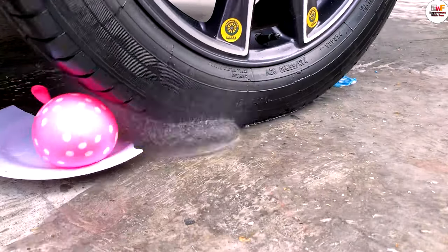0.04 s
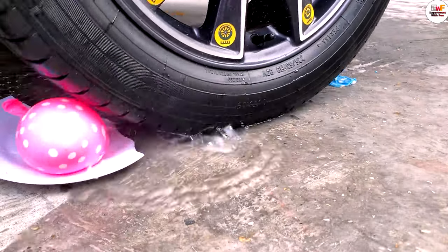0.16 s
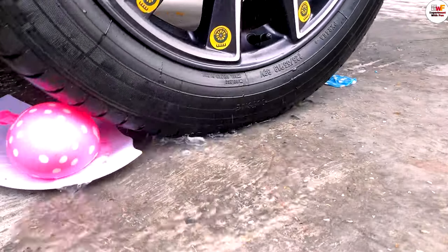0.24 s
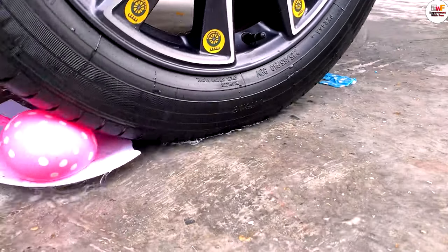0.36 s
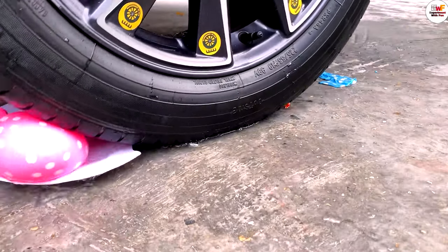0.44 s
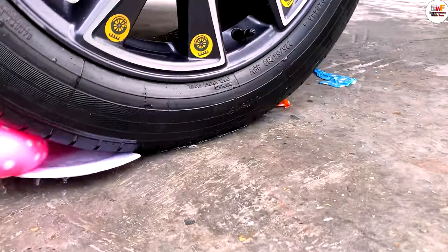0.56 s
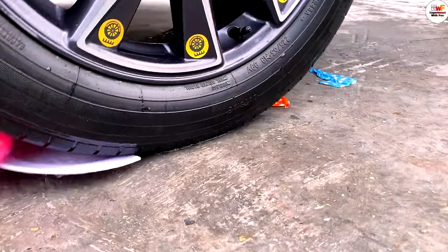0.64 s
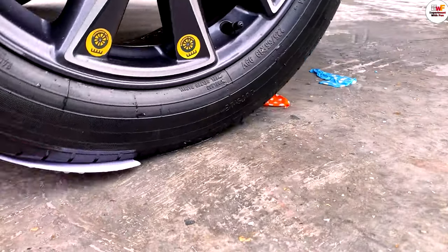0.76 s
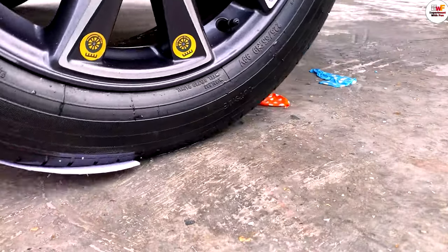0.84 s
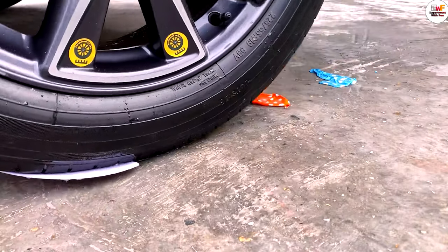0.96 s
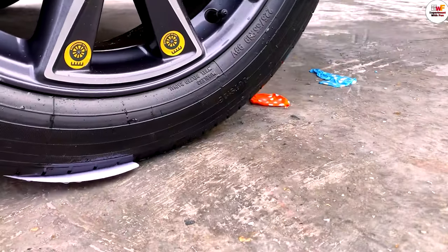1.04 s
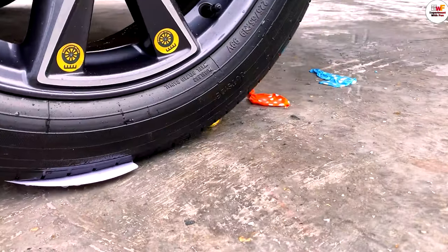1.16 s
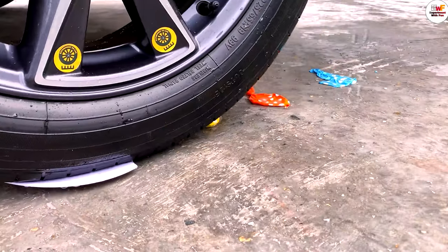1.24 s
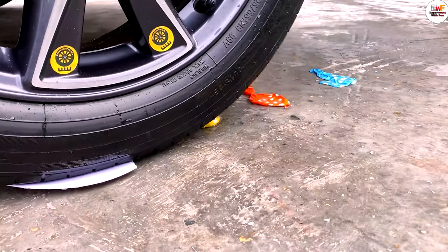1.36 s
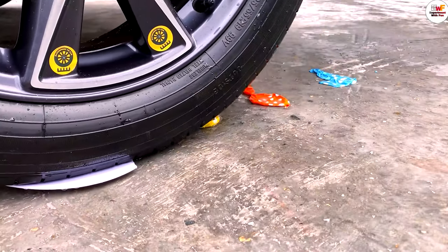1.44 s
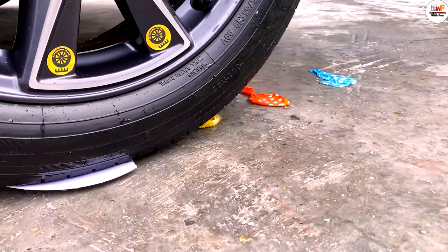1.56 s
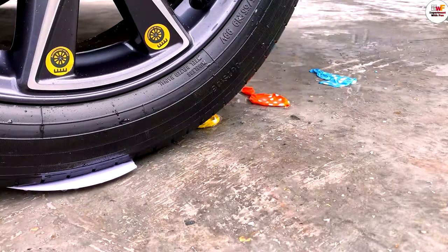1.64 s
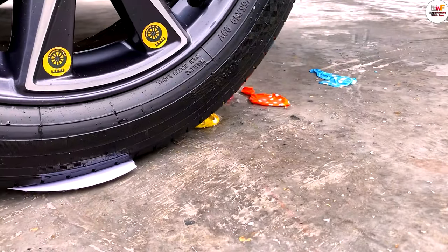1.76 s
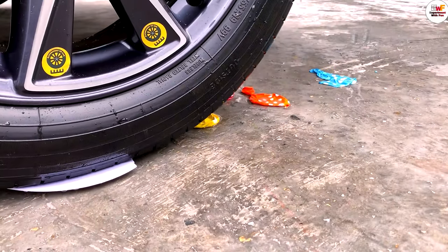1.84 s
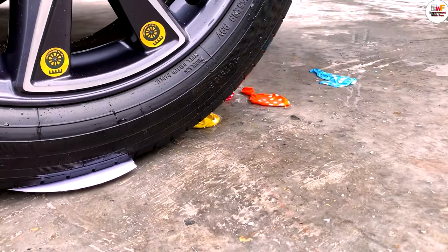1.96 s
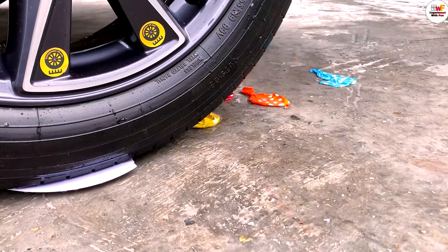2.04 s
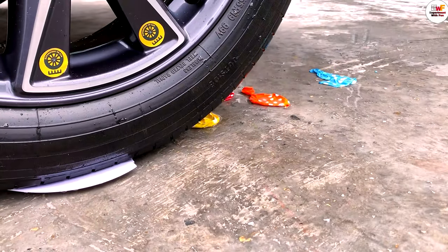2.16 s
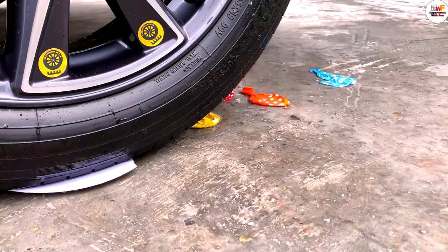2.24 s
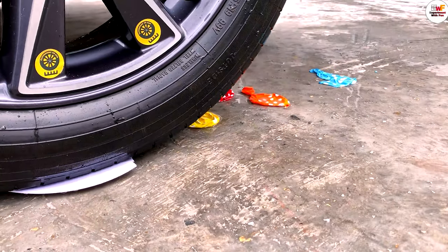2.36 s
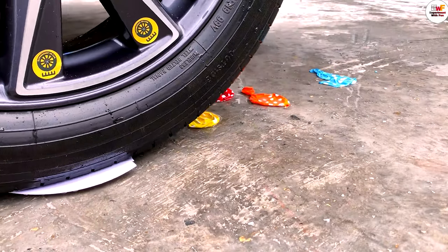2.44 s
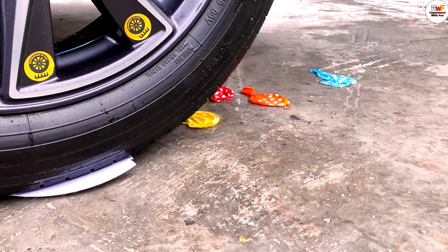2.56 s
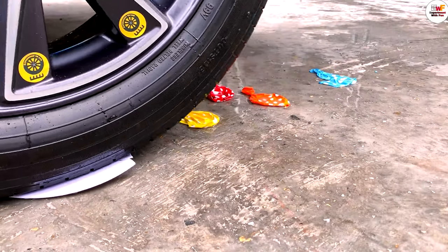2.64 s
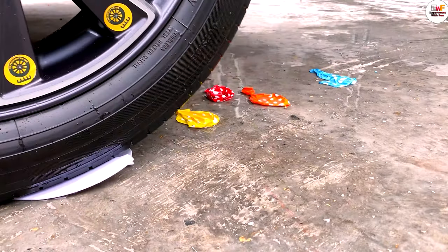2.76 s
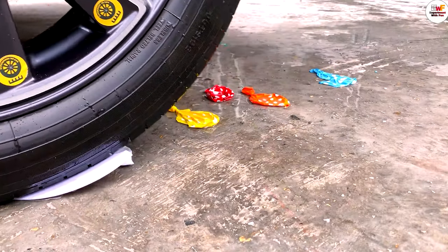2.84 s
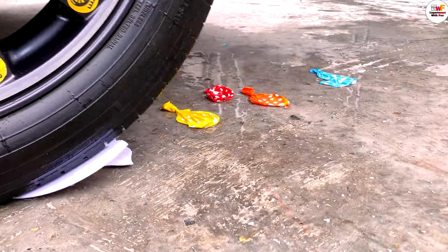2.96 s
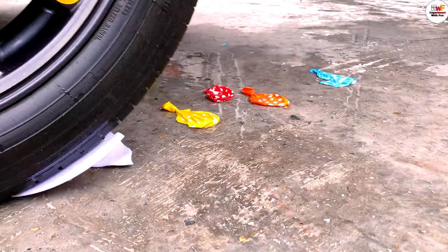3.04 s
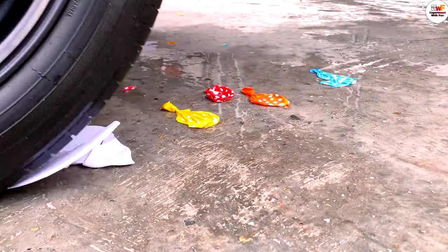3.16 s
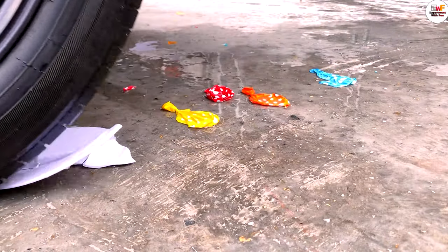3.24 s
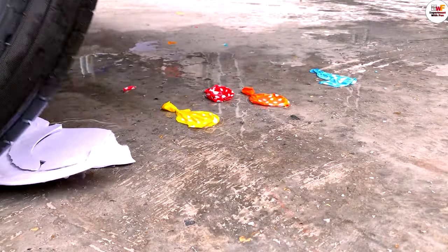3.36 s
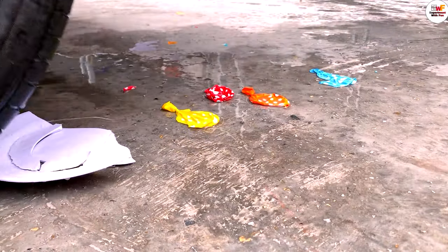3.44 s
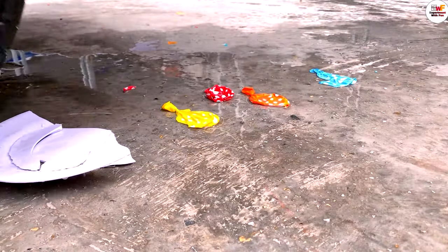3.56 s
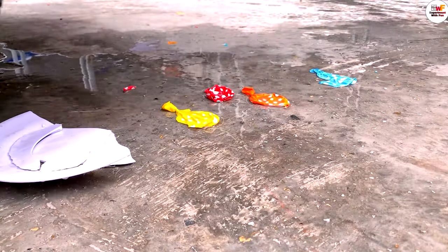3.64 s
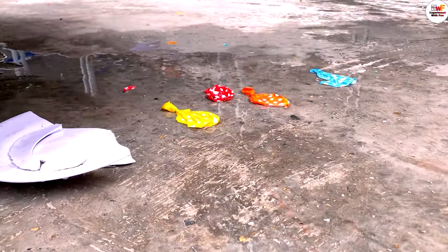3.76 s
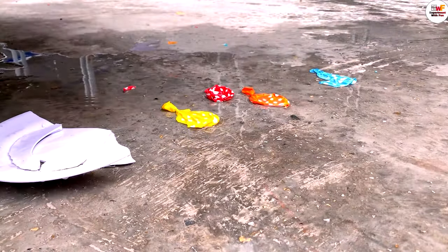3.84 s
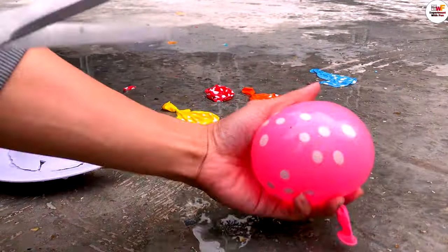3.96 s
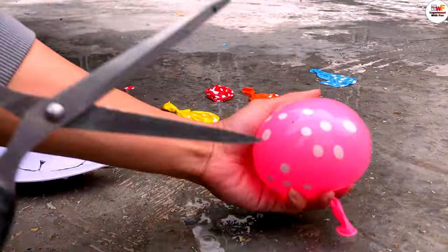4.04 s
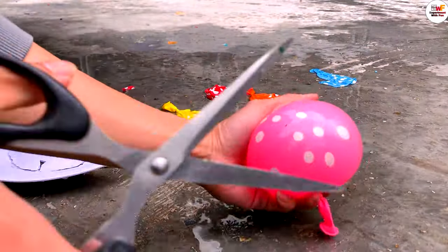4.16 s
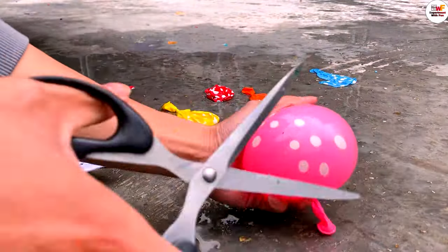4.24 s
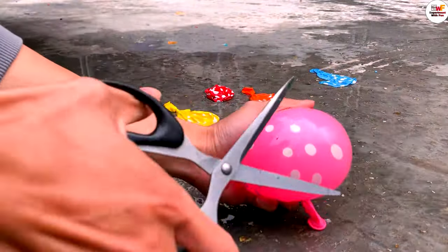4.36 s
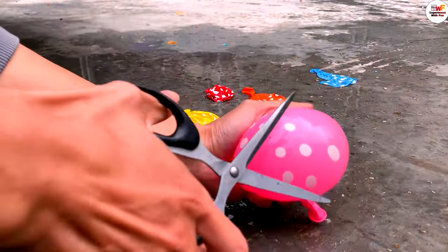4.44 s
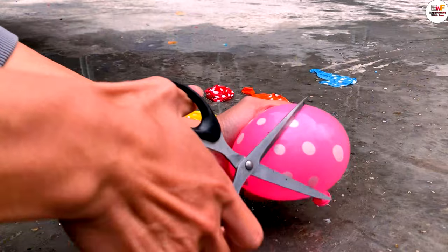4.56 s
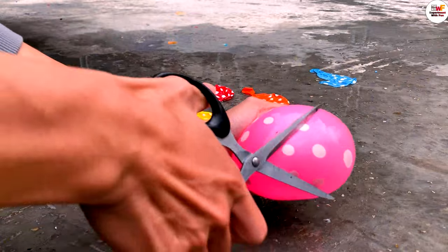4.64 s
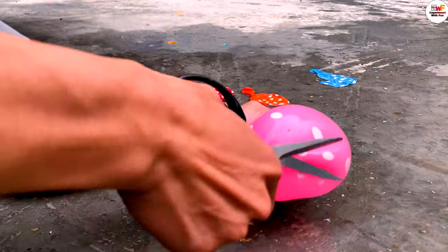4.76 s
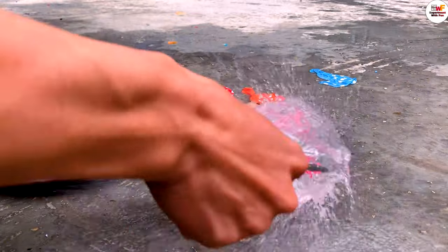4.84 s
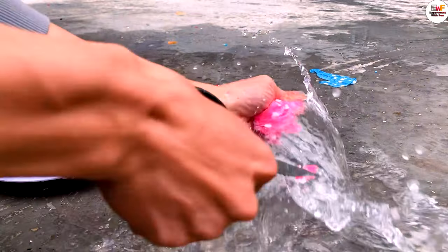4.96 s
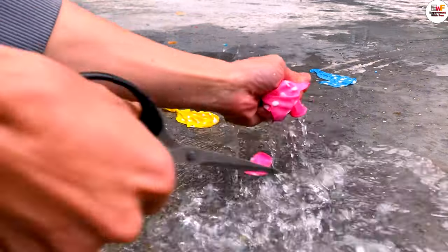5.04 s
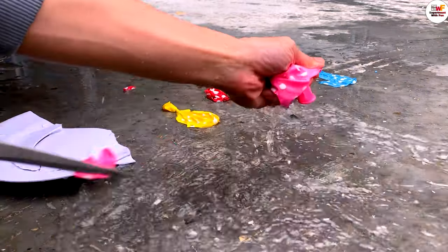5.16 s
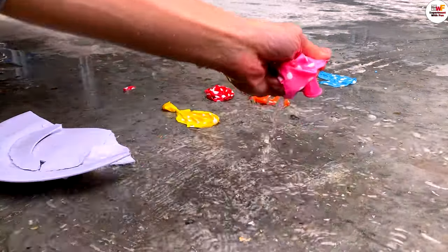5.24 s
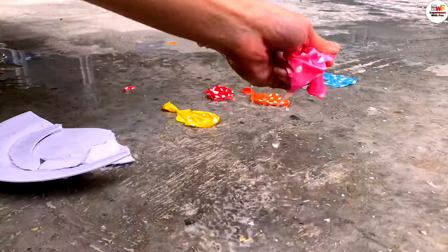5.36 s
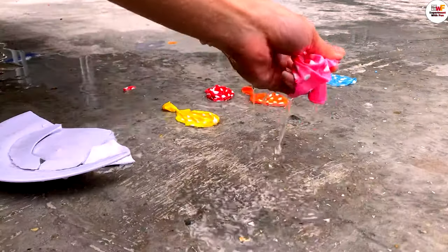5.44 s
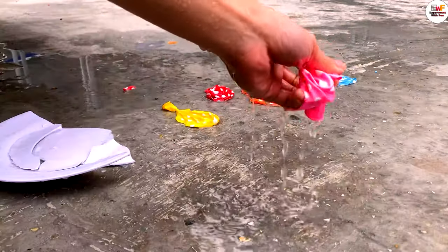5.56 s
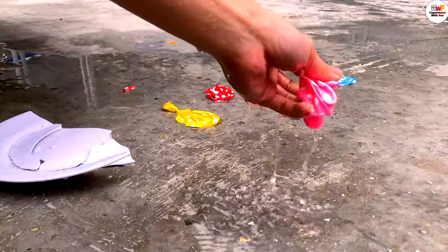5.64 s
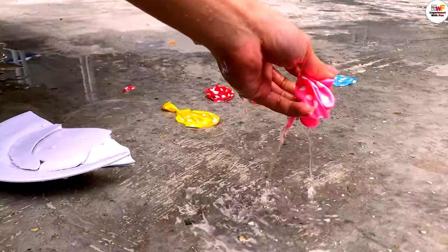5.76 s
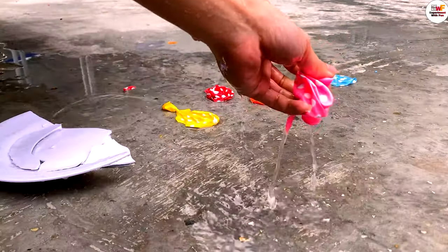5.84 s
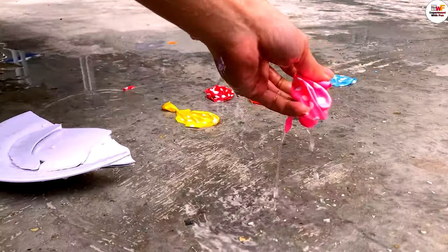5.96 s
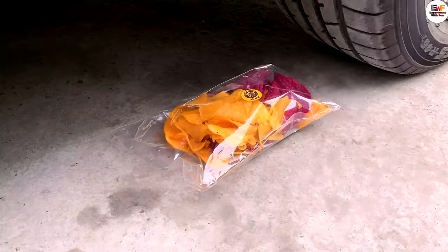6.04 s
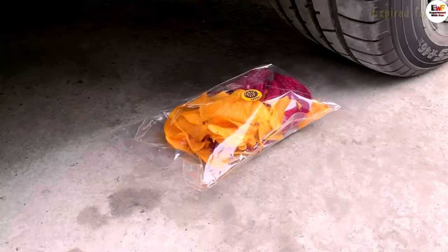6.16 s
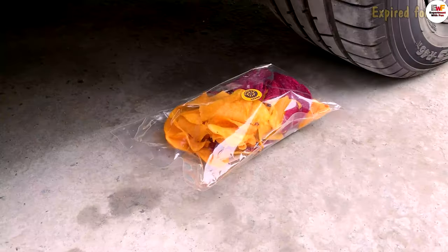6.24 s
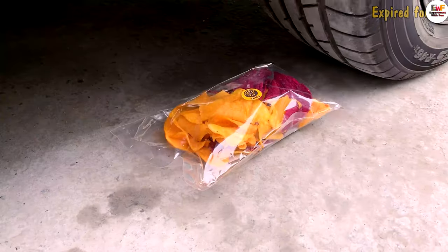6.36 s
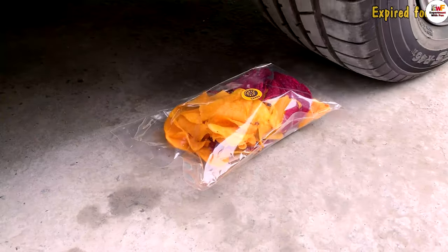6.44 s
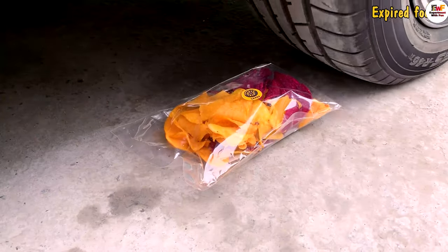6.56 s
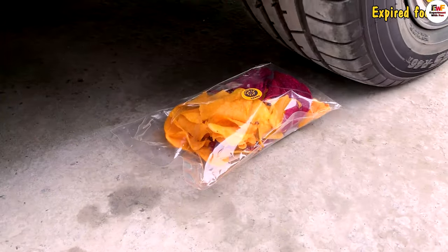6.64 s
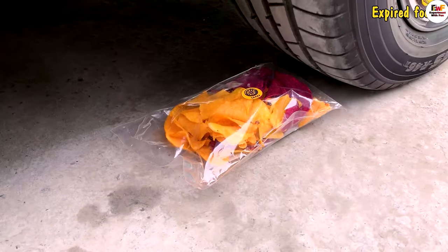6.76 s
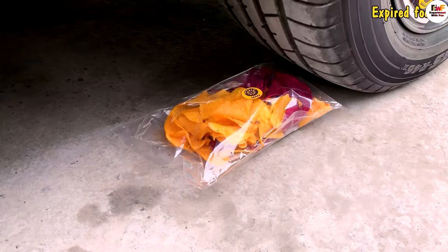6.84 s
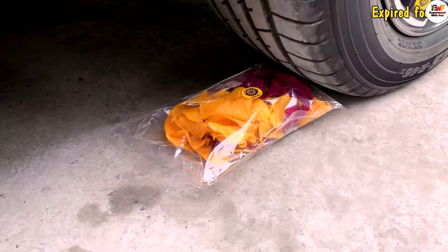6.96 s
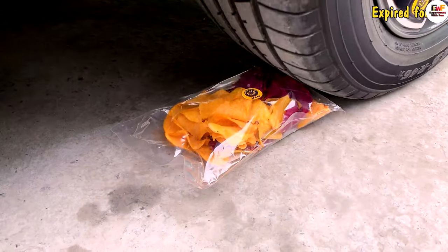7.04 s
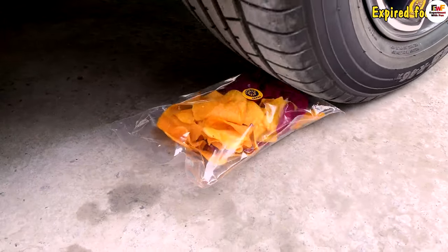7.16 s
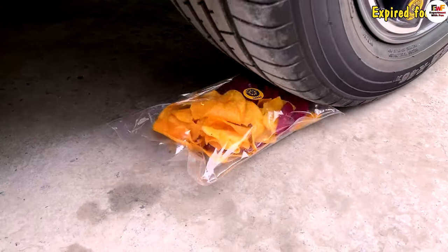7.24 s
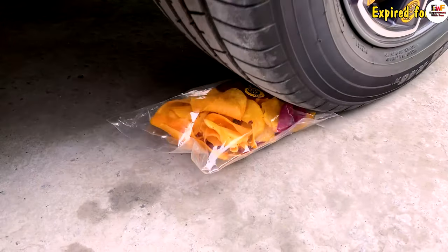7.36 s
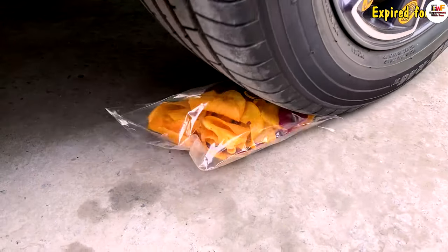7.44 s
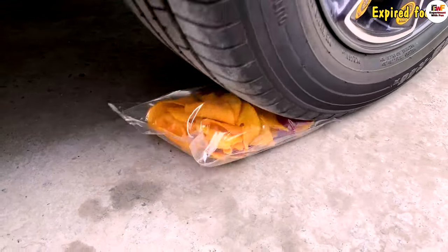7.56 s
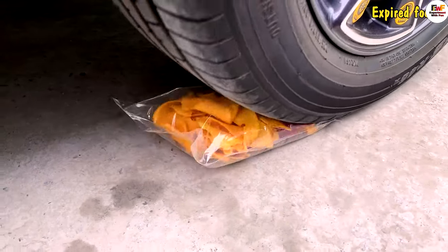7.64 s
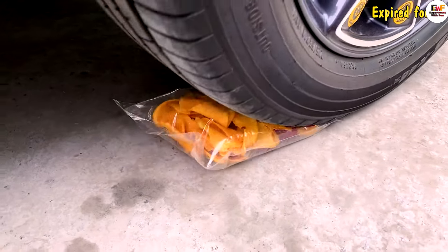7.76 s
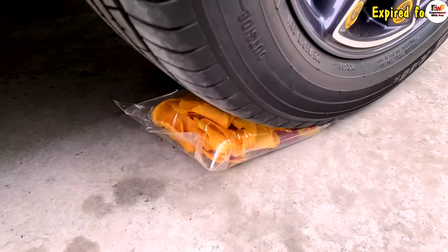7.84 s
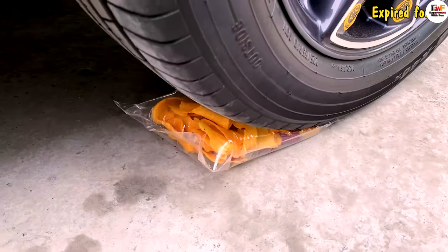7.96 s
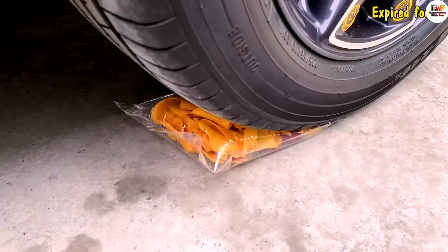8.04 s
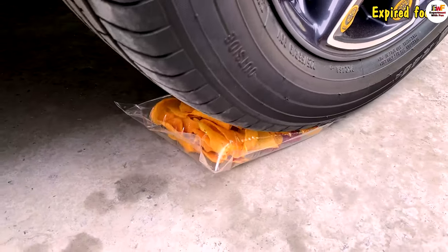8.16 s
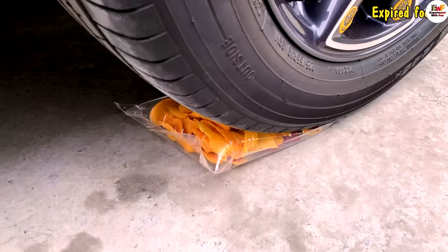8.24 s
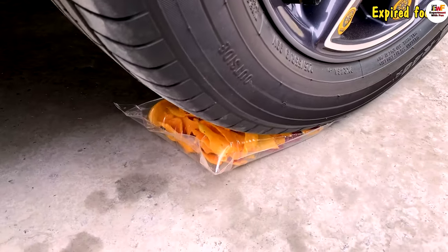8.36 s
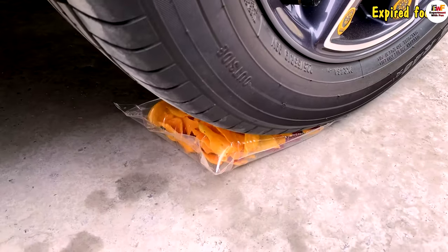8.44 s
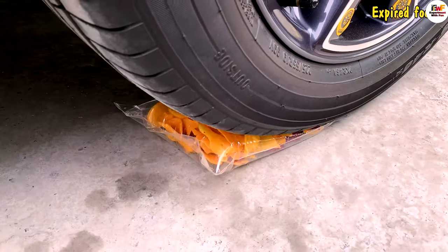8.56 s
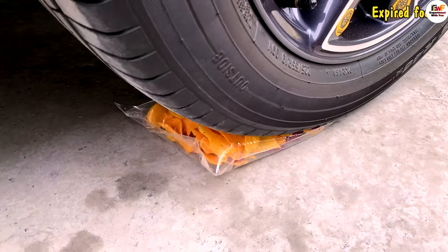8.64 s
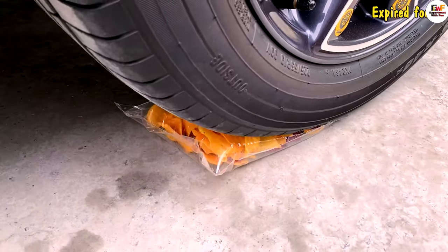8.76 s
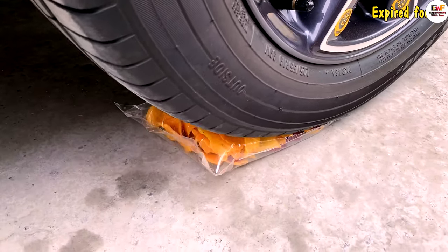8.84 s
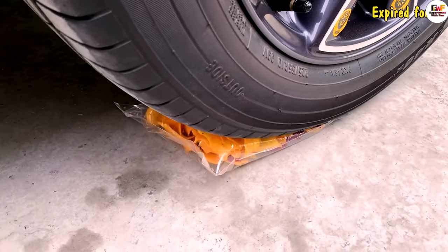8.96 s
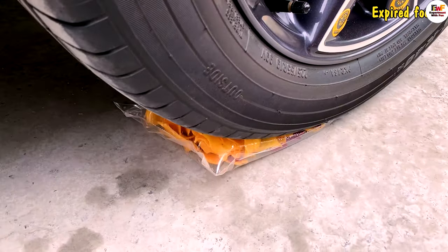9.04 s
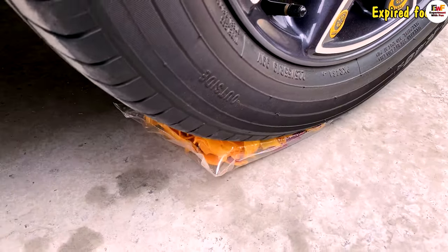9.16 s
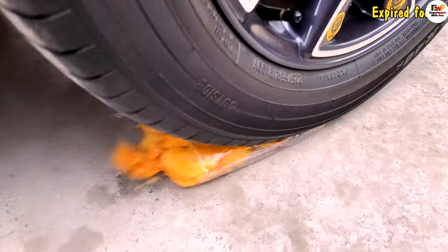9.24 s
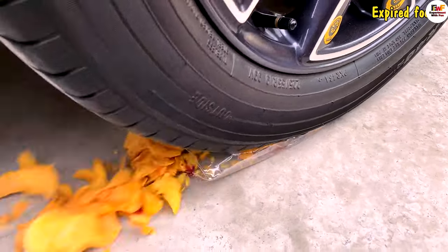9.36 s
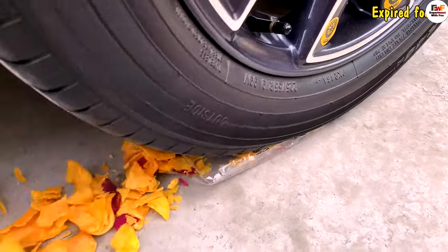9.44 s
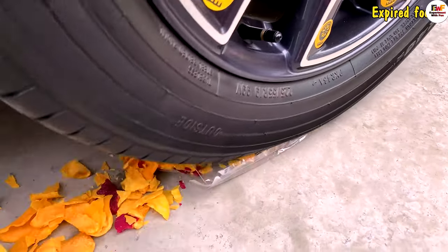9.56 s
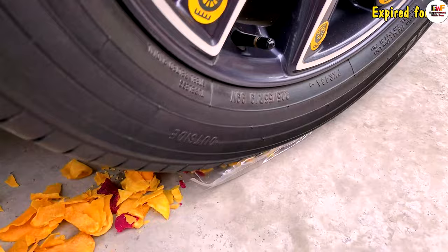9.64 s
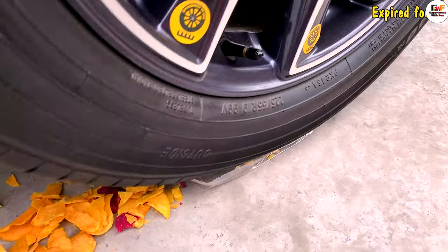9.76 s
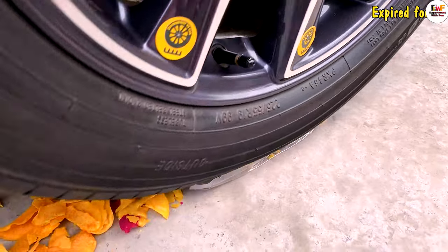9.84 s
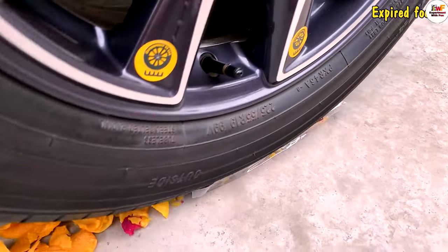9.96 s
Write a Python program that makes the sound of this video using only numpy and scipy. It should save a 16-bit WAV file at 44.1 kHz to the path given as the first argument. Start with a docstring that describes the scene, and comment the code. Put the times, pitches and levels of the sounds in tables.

```python
"""Three moments beside an idling car outdoors, over exhaust overtones and pulsing clatter.
First a tyre bursts water balloons and crushes a foam plate: cracks, a stick-slip judder and low whumps.
Then scissors snip a balloon that splashes on concrete: noise bursts, spray and gliding bubble tones.
Last a thin whine sounds and a tyre crunches a bag of crisps, in snaps over chance grains, until it pops.
A phone lies close to the ground and overloads on the loudest crunches: the peaks clip."""
import sys
import numpy as np
from scipy import signal
from scipy.fft import rfft, irfft, next_fast_len
from scipy.io import wavfile
from scipy.ndimage import uniform_filter1d, map_coordinates

SR = 44100
rng = np.random.default_rng(int(sys.argv[2]) if len(sys.argv) > 2 else 0)


def master_out(mix):
    """Clip the mix to full scale and print it as 16-bit PCM to the path in sys.argv[1]."""
    frames = np.transpose(np.atleast_2d(mix))
    ceiling = np.clip(frames, -1, 1)
    pcm = np.round(ceiling * 32767).astype(np.int16)
    wavfile.write(sys.argv[1], SR, pcm)


N = 440559
T = np.arange(N) / SR
SPLIT_HZ, TOP_HZ = 1525, 15650  # crackle lies above the split, thump below; the top is cut
# no colour: f/Hz, level/dB
FLAT = [(1, 0)]


def undb(db):
    """Decibels to an amplitude factor."""
    return 10 ** (np.asarray(db) / 20)


def unit(x):
    """Scale to rms 1."""
    return x / np.sqrt(np.mean(x ** 2))


def colour(x, points, low_hz=0, high_hz=SR):
    """Shape the spectrum of x by (Hz, dB) points between two soft edges; rms 1."""
    size = next_fast_len(x.shape[-1])
    f = np.arange(1, size // 2 + 2) * SR / size
    hz, db = np.transpose(points)
    gain = undb(np.interp(np.log(f), np.log(hz), db))
    gain = gain / np.sqrt((1 + (low_hz / f) ** 6) * (1 + (f / high_hz) ** 6))
    return unit(irfft(rfft(x, size) * gain, size)[..., :x.shape[-1]])


def walk(rate, n):
    """Random levels joined smoothly, rate a second; spread near 1."""
    steps = int(n * rate / SR) + 2
    fine = uniform_filter1d(np.repeat(rng.standard_normal(steps), 8), 8)
    return 1.2 * np.interp(np.arange(n) * 8 * rate / SR, np.arange(len(fine)), fine)


def curve(table, col, t):
    """Straight lines through one column of a table that starts with times."""
    rows = np.array(table)
    return np.interp(t, rows[:, 0], rows[:, col])


def span(t0, t1):
    """Samples, times and a gate with 8 ms fades, none at the start or end of the scene."""
    part = slice(int(t0 * SR), min(int(t1 * SR), N))
    t = T[part]
    since_start, until_end = t - t0 + (t0 == 0), t1 - t + (t1 > 9.9)
    return part, t, np.clip(np.minimum(since_start, until_end) / .008, 0, 1)


def pair(n, alike, lag):
    """Noise at two ports: a shared part, lag whole samples late on the right, and a part of each port's own."""
    lag = int(lag)
    shared, left, right = rng.standard_normal((3, n))
    alike = np.clip(alike, 0, 1)
    common = np.array([shared, np.roll(shared, lag)])
    return np.sqrt(alike) * common + np.sqrt(1 - alike) * np.array([left, right])


def grains(n, rate, spread_db, grain_s):
    """Envelope of chance hits, rate a second, of very unequal size that swell and die around grain_s."""
    when, size = rng.random((2, n))
    hits = (when < rate / SR) * undb(-spread_db * np.log(1 - size).clip(-4))
    fading = signal.lfilter([1], [1, -np.exp(-1 / (grain_s * SR))], hits)
    return unit(uniform_filter1d(fading, int(grain_s * SR)) + 1e-9)


def bed(tables, points, lag, rate, spread_db, grain_s, smooth, own):
    """Countless small breaks over a smooth share; each pitch band partly breaks at its own moments."""
    out = np.zeros((2, N))
    edges_hz = np.r_[0, SPLIT_HZ * 1.4 ** np.arange(-3, 7), SR]
    for table in tables:
        part, t, gate = span(table[0][0], table[-1][0])
        every = smooth + grains(len(t), rate, spread_db, grain_s)
        layers = []
        for low, high in zip(edges_hz, edges_hz[1:]):
            breaks = every + own * grains(len(t), rate / 4, spread_db, 2 * grain_s)
            noise = pair(len(t), .9 if high <= SPLIT_HZ else .6, lag)
            bandwidth_hz = min(high, TOP_HZ) - low
            layers.append(colour(breaks * noise, FLAT, low, high) * np.sqrt(bandwidth_hz))
        thump = colour(sum(layers[:4]), points)  # the four bands below the split
        crackle = colour(sum(layers[4:]), points)
        out[:, part] += gate * (undb(curve(table, 1, t)) * crackle + undb(curve(table, 2, t)) * thump)
    return out


def cracks(table, points, rings_hz, lag, rise_s, t60, width, body_slow, tint=(2500, 5.5, 7)):
    """Breaks swell fast and die: a bright tinted noise burst and a duller one round the thing's pitches.

    tint: (lowest Hz, range as a ratio, depth dB); the body dies body_slow times slower."""
    out = np.zeros((2, N))
    t = np.arange(-400, 3600) / SR
    chances = rng.random((len(table), 3 + len(rings_hz)))
    for (s, db, body_db, *gush), chance in zip(table, chances):
        i = int(s * SR) - 300
        # a gush holds the level before it dies
        after = (t - sum(gush)).clip(0) / (t60 * (0.72 + 1.13 * chance[1]))
        rise = np.exp(t.clip(None, 0) / rise_s)
        tint_hz = tint[0] * tint[1] ** chance[2]
        tint_points = [(tint_hz / 1.18, -tint[2]), (tint_hz, 0), (tint_hz * 1.7, -tint[2])]
        tinted = colour(pair(len(t), 0.6, lag), tint_points)
        # every piece breaks with its own peaks and hollows, up to 13.5 dB apart
        lumps = list(zip(np.geomspace(1200, 14000, 22), 13.5 * rng.random(22)))
        bright = colour(colour(tinted, lumps), points, low_hz=SPLIT_HZ) * undb(-60 * after)
        push = pair(len(t), 0.83, lag)
        body = 0
        # pitches shift a little for each piece and are stirred unequally, up to 10.5 dB apart
        for hz, stir in zip(np.array(rings_hz) * 1.14 ** (chance[0] - .5), chance[3:]):
            edges = [hz / (1 + width), hz * (1 + width)]
            sos = signal.butter(1, edges, "band", fs=SR, output="sos")
            body = body + undb(10.5 * stir) * unit(signal.sosfilt(sos, push))
        body = unit(body) * undb(body_db - 60 * after / body_slow)
        out[:, i:i + len(t)] += undb(db - 7.5) * rise * (bright + body)  # every table level is trimmed
    return out


def ring_bubbles(rows, t60=0.033):
    """Trapped air rings briefly as a rough sine whose pitch glides."""
    out = np.zeros(N)
    t = np.arange(int(.06 * SR)) / SR
    for s, db, hz, glide in rows:
        turn = 2 * np.pi * hz * (t + glide * t * t / 2) + 1.8 * walk(301, len(t))
        swell = (1 - np.exp(-t / 0.0047)) * undb(3.75 * walk(85, len(t)) - 60 * (t / t60) ** 2)
        out[int(s * SR):][:len(t)] += undb(db + 8.5) * swell * np.sin(turn)  # table levels are lifted
    return out


def place(x, wet_db, t60, pan_db):
    """Ground and bodywork scatter the sound into a short tail; positive pan leans left."""
    t = np.arange(int(.1 * SR)) / SR
    tails = signal.lfilter([1, -.85], [1], rng.standard_normal((2, len(t)))) * undb(-60 * t / t60)
    tails = tails / np.sqrt(np.sum(tails ** 2, axis=1, keepdims=True))
    wet = signal.oaconvolve(x, tails, axes=1)[:, :N]
    return (x + undb(wet_db) * wet) * undb([[pan_db / 2], [-pan_db / 2]])


# stretches of engine sound, the last from just after the bag bursts: from t/s, to t/s
ENGINE_SPANS = [(0, 3.964), (3.956, 5.994), (5.986, 9.25), (9.242, 10)]
# engine in each stretch: t/s, firing rate f/Hz, exhaust level/dB
ENGINE_LEVEL = [
    [(0.0, 23.14, -28), (0.58, 22.84, -20), (0.82, 22.89, -28), (1.9, 21.31, -35), (2.68, 23.68, -26),
     (3.05, 23.42, -27), (3.95, 22.52, -32)],
    [(3.97, 20.28, -32), (4.82, 20.19, -23.5), (5.97, 20.14, -32)],
    [(5.99, 18.1, -33), (7.4, 22.4, -24.5), (7.64, 23, -20.5), (8.49, 18.8, -26), (9.22, 21.3, -21)],
    [(9.25, 23.7, -24), (9.99, 23.3, -44.5)],
]
# exhaust overtones, the last set also for the last stretch: multiple of firing rate, relative level/dB
OVERTONES = [
    [(1, -1), (2, -1.5), (3, -1.5), (4, -5), (5, 0), (8, -17.5), (10, -16.5), (16, -15), (20, -25),
     (24, -17), (32, -24.5)],
    [(1, -1.5), (2, -2), (3, -4), (4, -10), (5, 3), (6, -12), (8, -8.5), (10, -13.5), (16, -14)],
    [(1, 1), (3, -6), (4, 2), (5, -0.5), (6, 3.5), (7, -8.5), (8, -7.5), (9, -8.5)],
]
# colour of engine clatter and street, from behind the wheel and from ahead of it:
# f/Hz, relative level/dB per Hz
CLATTER_COLOUR = [
    [(76, -34), (130, -3), (228, -6.5), (284, -7.5), (383, -6), (887, -22.5), (2060, -26.5), (6180, -36),
     (7800, -38), (8200, -30), (15500, -52)],
    [(76, -46), (130, -14.5), (307, -10), (391, -19), (595, -16.5), (942, -21.5), (3190, -23.5),
     (5160, -35.5), (12900, -38.5), (15500, -54)],
]
# valve gear ticks once a firing, heard from ahead of the wheel:
# low f/Hz, high f/Hz, level/dB re clatter, lateness in shares of a turn
VALVE_TICKS = [(8300, 10000, -5, .42)]
TICK_FADE = 0.45  # turns


def engine():
    """Exhaust overtones that waver, and clatter that pulses per firing and swells along with the exhaust level."""
    out = np.zeros((2, N))
    for k, clatter_db in enumerate([-40.5, -42.5, -42.5, -27.5]):
        part, t, gate = span(*ENGINE_SPANS[k])
        n, level_db = len(t), curve(ENGINE_LEVEL[k], 2, t)
        ahead = k // 2  # 0 behind the wheel, 1 ahead of it
        firing_hz = curve(ENGINE_LEVEL[k], 1, t) * (1 + 0.00505 * walk(4, n))
        turn = 2 * np.pi * np.cumsum(firing_hz) / SR
        exhaust = 0
        # each overtone lags a little more and wavers on its own
        for m, db in OVERTONES[min(k, 2)]:
            phase = m * turn - 0.1218 * m * m + 0.71 * walk(5.21, n)
            exhaust = exhaust + undb(db + 1.54 * walk(5.49, n)) * np.cos(phase)
        rumble = colour(pair(n, 0.97, 0), [(15, -21), (40, 1.0), (130, -4.5)], high_hz=137)
        rumble = rumble * undb(-6 + 2.0 * walk(5.46, n))
        low = colour(pair(n, 0.81, 0), CLATTER_COLOUR[ahead], high_hz=580)
        high = colour(pair(n, 0.025, 0), CLATTER_COLOUR[ahead], low_hz=546)
        beat_db = 1.3 * np.cos(turn) + 1.1 * walk(32, n)
        ticks = 0
        for low_hz, high_hz, db, late in VALVE_TICKS:
            fade = np.exp(-((turn / (2 * np.pi) - late) % 1) / TICK_FADE)
            ticks = ticks + undb(db) * fade * colour(pair(n, 0.23, 0), FLAT, low_hz, high_hz)
        along_db = np.minimum(level_db, -25) + 31.0
        clatter = (low + undb(-5.0) * high + ticks * ahead) * undb(clatter_db + beat_db + along_db)
        sides_db = np.array([[-.7], [.7]])  # the exhaust leans right
        out[:, part] += gate * ((unit(exhaust) + rumble) * undb(level_db + sides_db) + clatter)
    return out


# foam crackle: t/s, crackle level/dB, thump level/dB
FOAM_BED = [
    [(0.0, -42, -45), (0.615, -45.5, -34)],
    [(0.62, -31, -17), (0.83, -23, -28), (1.22, -26.5, -25.5), (1.35, -24.5, -21.5), (1.548, -43.5, -41),
     (1.75, -62, -64)],
    [(2.69, -16, -18.5), (2.82, -35.5, -29), (2.9, -29.5, -31), (3.18, -39.5, -34), (3.3, -59, -55)],
]
# colour of the foam: f/Hz, relative level/dB per Hz
FOAM_COLOUR = [(88, -28), (150, -6.5), (1240, -2), (1450, 1.5), (2140, 6), (8170, 4), (11400, 0),
               (13500, -5.5), (15500, -16)]


def foam_crackle():
    """Foam gives way in countless small breaks."""
    return bed(FOAM_BED, FOAM_COLOUR, lag=10, rate=300.0, spread_db=3.5, grain_s=0.001, smooth=0.6, own=1.1)


# single cracks of the plate: t/s, level/dB before the trim in cracks(), body level/dB re crack
FOAM_CRACKS = [(0.0638, -1, -7.5), (0.638, 4, -10), (0.692, -11, 6.5), (0.7122, 10.5, -31),
               (0.7309, 9.5, -11), (0.8094, 0, -13), (0.83, -3, -8), (0.8665, -4, -16), (0.887, -4, -3),
               (0.9018, -1.5, -4), (0.927, -4, -28), (0.9632, 4.5, -8.5), (1.032, -7.5, -10),
               (1.069, -6, -7), (1.0865, -1, -0.5), (1.0994, -4.5, 0), (1.2977, 3.5, -11.5),
               (1.7534, -28.5, 19.5), (2.5752, -16.5, -3), (2.7001, -2, 2.5), (2.7309, -11.5, 5),
               (2.83, -6, -30), (2.8418, 0.5, -34), (2.8975, 0.5, -1.5), (2.928, -6.5, -8),
               (2.9652, -13, -2), (3.028, 0, -6), (3.0879, -26, 8), (3.1723, -11.5, -6)]
# pitches at which the pieces of plate ring: f/Hz
FOAM_HZ = [900, 1150, 1460]


def foam_cracks():
    """The plate snaps, and its pieces ring at their own pitches."""
    return cracks(FOAM_CRACKS, FOAM_COLOUR, FOAM_HZ, lag=10, rise_s=0.002, t60=0.015,
                  width=0.062, body_slow=3.1)


# bubbles in the spilt water: t/s, level/dB before the lift in ring_bubbles(), f/Hz,
# upward glide as share of pitch [1/s]
WATER_BUBBLES = [(0.08, -23, 1090, -1), (0.241, -27, 903, 10), (0.304, -33, 1360, 4),
                 (0.645, -9.5, 890, -0.5), (3.13, -35, 950, -7), (3.152, -32, 916, -4),
                 (3.19, -36, 1470, -8), (4.922, -38, 2200, 1), (4.948, -36, 1500, 0), (4.957, -37, 2110, 9),
                 (4.968, -32, 2420, 8), (4.991, -29, 1510, -2), (5.024, -16.5, 1040, 5),
                 (5.113, -29, 1140, 26)]


def bubbles():
    """Air trapped in the spilt water rings."""
    return ring_bubbles(WATER_BUBBLES)


# splats of water: t/s, level/dB before the trim in cracks(), body level/dB re crack
WATER_SPLATS = [(0.237, -22, 5), (0.276, -26, -13), (4.8765, -1.5, 1.5), (5.009, 0, -19),
                (5.0444, -6.5, -29), (5.258, -25, -21), (5.536, -24, -27), (5.9091, -25, -26)]
# pitches of the puddle: f/Hz
PUDDLE_PITCHES = [880, 1500]
# colour of the water: f/Hz, relative level/dB per Hz
WATER_COLOUR = [(290, -53), (500, 1), (1330, -7), (1990, -5), (5200, -0.5), (13400, -4), (15500, -24)]


def splats():
    """Water slaps down as short noise bursts over the pitches of the puddle."""
    return cracks(WATER_SPLATS, WATER_COLOUR, PUDDLE_PITCHES, lag=0, rise_s=0.00066, t60=0.016,
                  width=0.11, body_slow=1.7, tint=(2600, 2.4, 9))


# the skin tears: t/s, level/dB before the trim in cracks(), body level/dB re crack, gush [s]
BALLOON_TEAR = [(.628, -4.5, -2.5, 0.0098)]
# pitch of the rush of air or water out of a torn skin: f/Hz
RUSH_HZ = [483]


def balloon_burst():
    """The skin tears open and gushes briefly at full level before it dies."""
    return cracks(BALLOON_TEAR, FOAM_COLOUR, RUSH_HZ, lag=11.0, rise_s=0.013, t60=0.035,
                  width=0.25, body_slow=7.7)


# a quick uneven run of cracks: t/s, level/dB before the trim in cracks()
STICK_SLIPS = [(1.131, -8), (1.153, 8), (1.1687, 4), (1.1724, 2), (1.1752, 6), (1.1862, 2), (1.2007, -8),
               (1.212, 8.5), (1.23, 0), (1.24, 2), (1.244, 2), (1.2545, 6), (1.2617, 7), (1.2734, 0),
               (1.279, 4), (1.2897, 2)]


def judder():
    """The foam sticks and slips under the tread, each slip a very short crack with some body."""
    rows = [(s, db, -13.5) for s, db in STICK_SLIPS]
    return cracks(rows, FOAM_COLOUR, FOAM_HZ, lag=11, rise_s=0.0004, t60=0.0043,
                  width=0.51, body_slow=4.6, tint=(4200, 1.15, 9))


# whumps: t/s, hiss level/dB before the trim in cracks(), body level/dB re hiss, push [s]
TYRE_WHUMPS = [(1.315, -12, 3.8, 0.02), (2.73, -26, 6.5, 0.033)]
# pitch of the whump: f/Hz
TYRE_HZ = [146]


def whumps():
    """The tyre settles with a low whump as the foam gives way."""
    return cracks(TYRE_WHUMPS, FOAM_COLOUR, TYRE_HZ, lag=21, rise_s=0.0046, t60=0.022,
                  width=0.54, body_slow=2.8)


# spray: t/s, crackle level/dB, thump level/dB
WATER_BED = [
    [(4.55, -52, -67), (4.8, -61, -56)],
    [(4.805, -32, -45), (4.977, -30, -51), (5.3, -48, -72)],
]


def spray():
    """Flying water patters as countless small hits."""
    return bed(WATER_BED, WATER_COLOUR, lag=0, rate=290.0, spread_db=3.0, grain_s=0.0012,
               smooth=0.43, own=0.65)


# the cut skin tears: t/s, level/dB before the trim in cracks(), body level/dB re crack, gush [s]
SNIP_TEAR = [(4.834, 0, -26, 0.0061)]


def snip_burst():
    """The snipped skin opens with a bright burst over a faint body that dies slowly."""
    return cracks(SNIP_TEAR, WATER_COLOUR, PUDDLE_PITCHES, lag=0, rise_s=0.00091, t60=0.047,
                  width=0.15, body_slow=7.0, tint=(11000, 1.2, 6))


def droplets(t0, t1, db, count):
    """Small chance bubbles between two times, gliding up as they ring."""
    when, size, pitch, glide = rng.random((count, 4)).T
    rows = zip(t0 + (t1 - t0) * when, db - 12 * size, 1000 * 2.6 ** pitch, 14 * glide)
    return ring_bubbles(rows, t60=.013)


# the water lands: t/s, level/dB before the trim in cracks(), body level/dB re crack, gush [s]
WATER_LANDING = [(5, -10, -2.5, 0.022)]
# pitch of the gush: f/Hz
LANDING_HZ = [1710]


def gush():
    """The water of the cut balloon lands as a broad rush of noise."""
    return cracks(WATER_LANDING, WATER_COLOUR, LANDING_HZ, lag=0, rise_s=0.0052, t60=0.034,
                  width=0.56, body_slow=3.7, tint=(3000, 1.8, 8))


# when the whine sounds: from t/s, to t/s
WHINE_SPAN = (5.99, 7.1)
# thin tones under the bonnet: f/Hz, level/dB
WHINE_TONES = [(301.5, -48), (597.5, -45), (1098, -58.5)]


def whine():
    """Thin tones of steady pitch under the bonnet, each wavering in level."""
    out = np.zeros((2, N))
    part, t, gate = span(*WHINE_SPAN)
    for hz, db in WHINE_TONES:
        out[:, part] += gate * undb(db + 2 * walk(8.5, len(t))) * np.sin(2 * np.pi * hz * t)
    return out


# crackle of the bag: t/s, crackle level/dB, thump level/dB
BAG_BED = [
    [(7.035, -12.5, -22.5), (7.231, -32.5, -23), (7.33, -20.5, -22)],
    [(7.335, -14, -11.5), (7.387, -9, -10.5), (7.653, -6, -9), (8.409, -18.5, -29.5), (8.68, -23, -33.5),
     (8.87, -16, -25), (9.245, -11, -30)],
    [(9.25, -28, -17.5), (9.362, -20.5, -15), (9.618, -25, -26), (9.99, -24, -24)],
]
# colour of the crisps: f/Hz, relative level/dB per Hz
CRISP_COLOUR = [(59, -56), (100, -11), (306, -11), (576, -7.5), (800, -11), (1200, -12), (2000, -16),
                (2750, -12.5), (7250, -17), (8950, -18), (15500, -22)]


def crisp_crackle():
    """Crisps crumble in countless small breaks, then crumbs slide out of the torn bag."""
    crumble = bed(BAG_BED[:2], CRISP_COLOUR, lag=4.72, rate=250., spread_db=3.95, grain_s=0.0013,
                  smooth=0.44, own=0.86)
    crumbs = bed(BAG_BED[2:], CRISP_COLOUR, lag=5.1, rate=300., spread_db=4.8, grain_s=0.0012,
                 smooth=0.73, own=0.91)
    return crumble + crumbs


# the loudest snaps in the bag: t/s, level/dB before the trim in cracks()
CRISP_SNAPS = [(7.041, -10), (7.1308, -7), (7.1461, -2), (7.171, 6), (7.196, -2), (7.2575, -8.5),
               (7.2865, -1.5), (7.3355, 0), (8.0315, -4), (8.052, -7), (8.0754, 3), (8.117, -8),
               (8.1822, -4), (8.2008, 4), (8.2513, 1.5), (8.281, -7), (8.3002, -0.5), (8.326, 7.5),
               (8.363, -14), (8.4047, -4), (8.4433, 3.5), (8.4714, 0.5), (8.5035, -15), (8.5457, 5),
               (8.594, -6), (8.6204, 3), (8.6494, 5), (8.723, 2.5), (8.735, -3), (8.75, 1), (8.7882, 0),
               (8.804, 11.5), (8.827, 1), (8.858, -0.5), (8.876, 0), (8.959, 4), (8.989, -6), (9.038, -11),
               (9.051, -1), (9.071, 0), (9.134, 6), (9.5347, -7.5)]
# pitches at which the bag rings: f/Hz
BAG_PITCHES = [200, 467, 580, 950, 1200, 2900]


def snaps():
    """Crisps snap, and the bag thuds about as loudly at most snaps, big or small."""
    when, db = np.transpose(CRISP_SNAPS)
    thud_db = np.minimum(-9 - db, 0) + 4 * rng.standard_normal(len(db))  # re snap, with scatter
    return cracks(list(zip(when, db, thud_db)), CRISP_COLOUR, BAG_PITCHES, lag=3.7, rise_s=0.0024,
                  t60=0.017, width=0.09, body_slow=2.5, tint=(2100, 3.5, 8))


def small_snaps(count):
    """Chance snaps that follow the crackle of the bag, each with a weaker thud."""
    when, size, body = rng.random((count, 3)).T
    rows = sum(BAG_BED, [])
    when = rows[0][0] + (rows[-1][0] - .1 - rows[0][0]) * when
    db = curve(rows, 1, when) + 10 - 9 * size  # before the trim in cracks()
    return cracks(list(zip(when, db, -4.0 - 16 * body)), CRISP_COLOUR, BAG_PITCHES, lag=3.2,
                  rise_s=0.00064, t60=0.015, width=0.067, body_slow=0.75, tint=(1800, 5., 14))


# the bag pops: t/s, level/dB before the trim in cracks(), body level/dB re crack, gush [s]
BAG_TEAR = [(9.218, -1.2, 6, 0.017)]


def bag_burst():
    """The bag tears open and its air rushes out."""
    return cracks(BAG_TEAR, CRISP_COLOUR, RUSH_HZ, lag=3.4, rise_s=0.0043, t60=0.02,
                  width=0.56, body_slow=1.9)


def scene():
    """Foam, water and crisps, each with its short tail, beside the engine and its whine."""
    plate = foam_crackle() + foam_cracks() + balloon_burst() + judder() + whumps()
    water = bubbles() + splats() + spray() + snip_burst() + droplets(4.89, 5.09, -31, count=26) + gush()
    crisps = crisp_crackle() + snaps() + small_snaps(count=85) + bag_burst()
    near = place(plate, wet_db=-9, t60=.09, pan_db=0)
    near += place(water, wet_db=-7, t60=.09, pan_db=.8)
    near += place(crisps, wet_db=-8, t60=.05, pan_db=.7)
    return engine() + whine() + near


PORT_HZ, PORT_LAG = 8600, 9.7  # where the top treble starts; how late it is on the left, in samples


def record(dry):
    """The top treble enters mostly as one wave that reaches the left port later; peaks clip; the top is cut."""
    treble = signal.sosfiltfilt(signal.butter(6, PORT_HZ, "high", fs=SR, output="sos"), dry)
    late = map_coordinates(treble[1], [np.arange(N) - PORT_LAG], order=5)
    left = late + 0.24 * treble[0]
    ports = dry - treble + np.array([left, treble[1]])
    top_cut = signal.ellip(8, .1, 60, TOP_HZ, fs=SR, output="sos")
    return signal.sosfilt(top_cut, np.clip(ports, -1, 1))


dry = scene()
out = record(dry)
master_out(out)
```